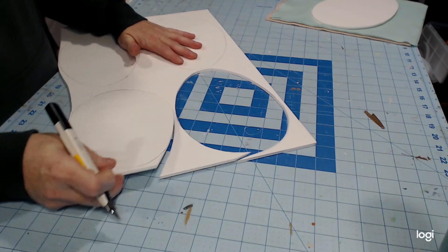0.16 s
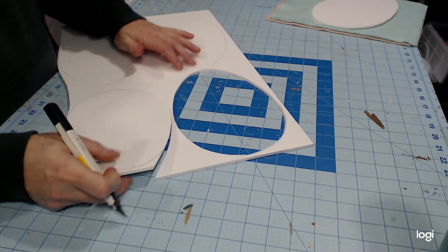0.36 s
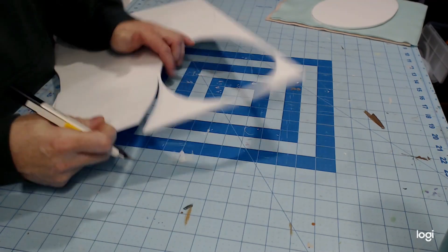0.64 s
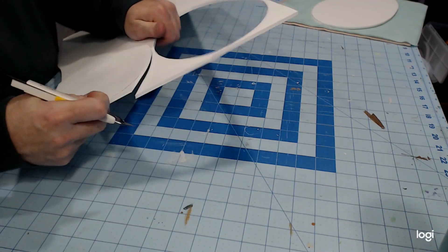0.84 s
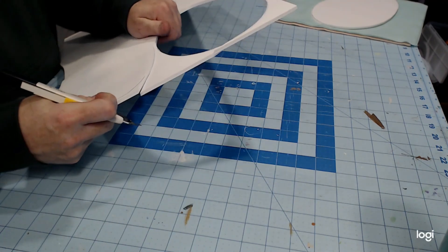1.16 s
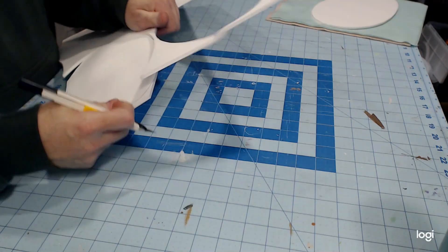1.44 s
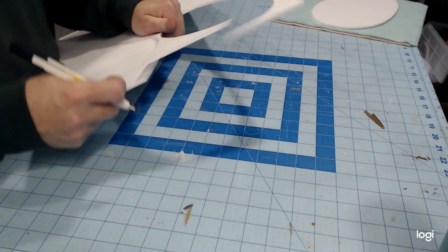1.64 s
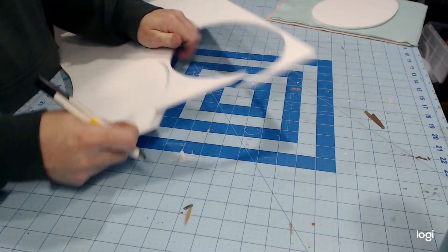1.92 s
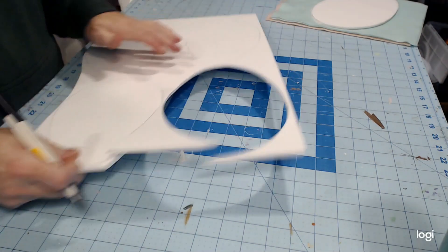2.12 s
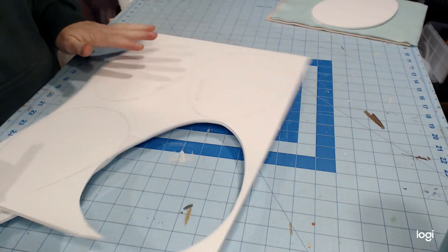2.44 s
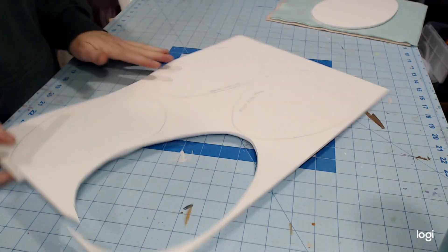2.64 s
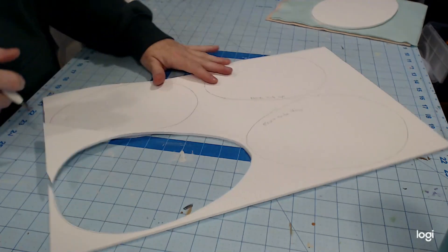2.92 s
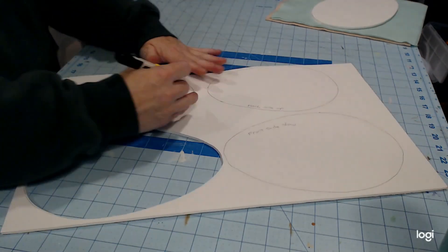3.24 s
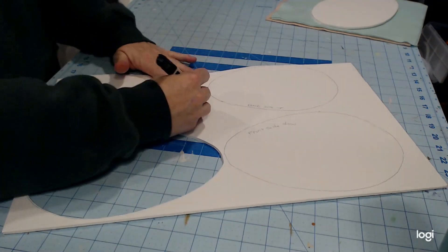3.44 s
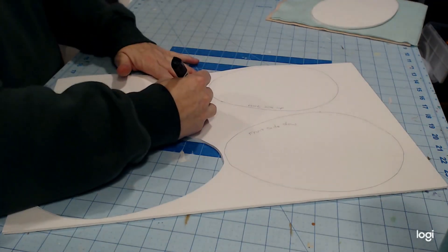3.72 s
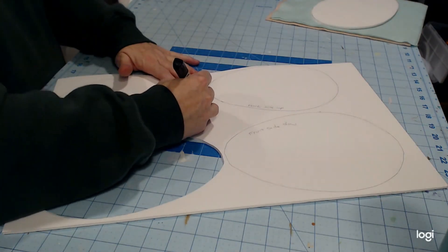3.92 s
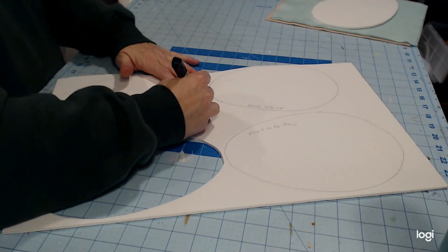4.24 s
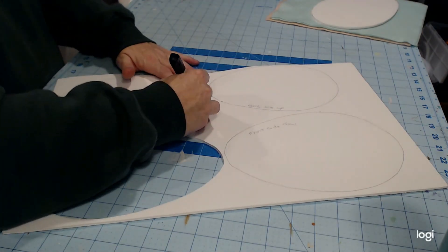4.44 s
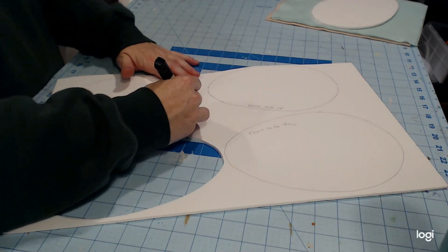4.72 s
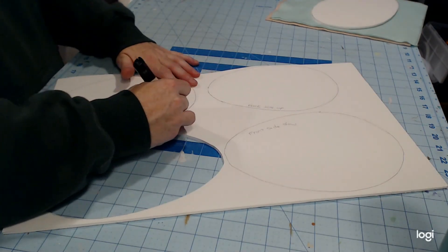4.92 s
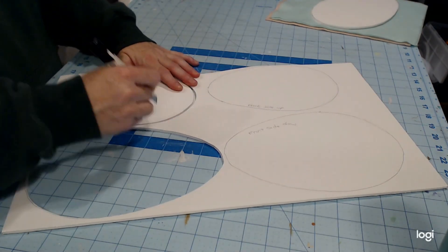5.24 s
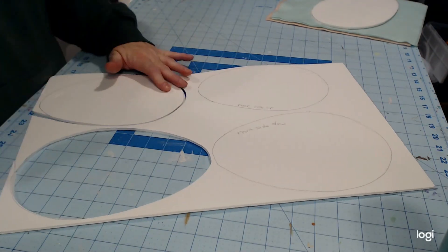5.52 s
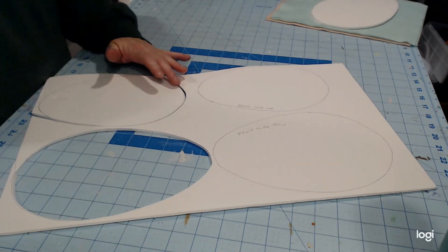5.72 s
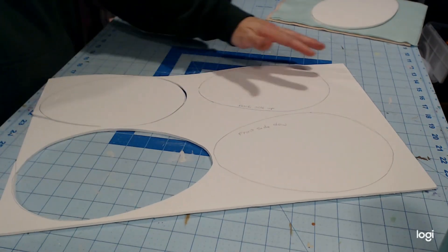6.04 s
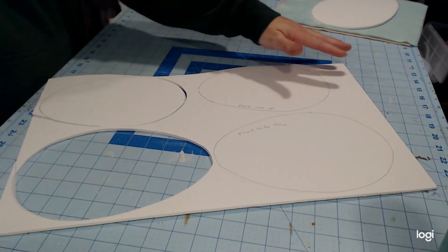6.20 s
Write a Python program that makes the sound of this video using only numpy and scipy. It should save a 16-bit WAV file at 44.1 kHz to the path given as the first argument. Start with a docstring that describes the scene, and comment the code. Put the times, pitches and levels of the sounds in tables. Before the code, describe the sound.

In a quiet room, close stereo microphones catch foam board scuffed and rattled on a table. Sharp hollow knocks peak just after one second, loud enough to distort, with more before two seconds. A long fizzy slide over the mat follows for about a second, with squeaks and ticks. Then a knife pushes through quietly with a low groan, ending in a crisp crackle, faint rubs and soft table bumps over light hiss.

```python
"""In a quiet room, at a table with a cutting mat, a sheet of foam board is lifted, knocked, turned and slid;
then a knife is pushed through it. Rubbing is noise of dense tiny slips that rings the sheet. Each knock is a
rattling contact that drives decaying modes, with a short noise crack; strong ones overload the input.
Filtered noise makes the ticks, the narrow squeals, the groan under the blade and the table's soft bumps.
Air noise, hum and a pulsing whine lie beneath, all heard by a close pair of microphones."""
import sys
import numpy as np
from scipy import signal
from scipy.fft import rfft, irfft, next_fast_len
from scipy.io import wavfile
from scipy.ndimage import uniform_filter1d

SR = 44100
rng = np.random.default_rng(int(sys.argv[2]) if len(sys.argv) > 2 else 0)


def waveform_to_disk(signal):
    """Save audio, clipped to [-1, 1], as 16-bit WAV at the path in sys.argv[1]."""
    frames = np.transpose(np.atleast_2d(signal))
    scaled = np.clip(frames, -1, 1) * 32767
    samples = np.round(scaled).astype(np.int16)
    wavfile.write(sys.argv[1], SR, samples)


N = 280917  # length in samples

# Room air spectrum. Each row: frequency in Hz, relative density in dB per Hz.
AIR_SPECTRUM = [(50, -13), (70, -7), (124, -6), (184, -8), (880, -24.5), (1190, -26.5), (2580, -32.5),
                (7400, -36), (8700, -41), (15900, -47.5)]
AIR_DB = -68.5
# Mains-like low hum. Each row: frequency in Hz, level in dB.
HUM_TONES = [(118.4, -69.5)]
# Faint tones of the electronics. Each row: frequency in Hz, level before pulsing in dB.
WHINE_TONES = [(8000, -85.5), (11900, -104)]
WHINE_PULSES_HZ = 27
# Coherence of the microphones. Each row: frequency in Hz, left-right likeness from 0 to 1.
LIKENESS = [(100, 0.13), (250, 0.93), (600, 0.9815), (1200, .85), (2500, 0.55), (5000, 0.68), (12000, .65)]
# Phase between the microphones. Each row: frequency in Hz, lead of the left in radians.
LEFT_LEAD = [(300, 0.3), (1000, .4), (2200, 1.3), (5000, 1.3), (8000, 1.8), (14000, 0.64)]

# Resonances of the rubbed sheet. Each row: mean frequency in Hz, width in Hz, relative level in dB.
RUB_RESONANCES = [(2004.4, 30, 0.5), (2956, 150, 4.5), (3890, 150, -4.5), (4945, 22, -8.5),
                  (5045, 12, -10.5), (7050, 150, -14.5), (7880, 43, -13)]
# Spectrum of the fine slips. Each row: frequency in Hz, relative density in dB per Hz.
GRIT_SPECTRUM = [(710, -39), (1200, -20.5), (1680, -17), (1910, -8), (2590, -7), (3210, -4), (4440, -6),
                 (5170, -5.5), (7070, -6), (8500, -19), (14800, -27), (15900, -31)]
# Spectrum of the rubbed sheet's low body. Each row: frequency in Hz, relative density in dB per Hz.
BODY_SPECTRUM = [(76, -38), (130, -9.5), (235, -5.5), (324, -8.5), (580, -4.5), (669, -7), (1800, -6.5),
                 (2340, -36.5), (3960, -120)]
BODY_PER_DB = -0.163  # lighter pressure leaves more body against the fizz
# Strokes of hand, sheet and blade. Each row: start, rise, hold and fall in seconds, pressure as the hold
# begins and as it ends in dB, body of the sheet at full pressure in dB, mean centre of the body in Hz.
STROKE_ROWS = [(0.0, .005, .055, 0.1217, -59, -55, -1, 786),
               (.195, .008, .19, 0.01093, -46, -53.5, -11, 932),
               (.39, .005, .076, 0.11, -45.5, -36.5, -4, 912), (.5, .03, .105, 0.008, -44, -51, -3, 863),
               (.635, .01, .036, 0.13037, -30, -46, 1.5, 877),
               (.78, .014, .052, 0.0847, -42.5, -42.5, -5.5, 976),
               (.952, .005, .01, 0.11, -61, -62, 2.5, 620), (1.1, .05, .004, 0.0044, -38, -22.5, -8, 1004),
               (1.22, .005, .195, 0.00527, -55.5, -54, 8, 1077),
               (1.45, .01, .005, 0.1456, -50, -44.5, -3.5, 607),
               (1.63, .01, 0.055, 0.023, -62.5, -65.5, 10, 780),
               (1.7, .045, .075, 0.0551, -41, -22.5, 1.5, 836),
               (1.85, .005, .195, .005, -35, -47, -5.5, 967),
               (3.1, .025, .155, 0.036, -51.5, -46.5, -20, 896.6),
               (3.3, .03, .012, .03, -55, -60, -11, 872.3), (3.354, .005, .005, 0.23, -64.5, -70, -1, 783),
               (4.05, .012, .03, .13, -73, -68.5, 5, 1037), (4.3, .034, .4, 0.0279, -60, -62, -6.5, 574.8),
               (4.74, .04, .188, 0.00885, -48, -44.5, -16, 1052),
               (5.02, .003, .005, 0.088, -66, -60.5, 8, 894),
               (5.24, .07, .075, 0.1118, -54, -50.5, -10, 883.6),
               (5.47, .02, .225, 0.0594, -73.5, -70.5, -4, 914),
               (6.18, .15, .037, 0.0032, -76, -70.5, 4.5, 696.4)]
RISE_DB, FALL_DB = 23.5, 25  # how far below its hold a stroke begins and ends
# The long slide of the sheet over the mat. Each row: time in seconds, pressure in dB.
SLIDE_PRESSURE = [(2.052, -35.5), (2.062, -23), (2.216, -27), (2.346, -25), (2.436, -25.5), (2.448, -34.5),
                  (2.472, -22), (2.55, -22.5), (2.576, -32), (2.598, -25), (2.62, -34.5), (2.65, -30.5),
                  (2.664, -30.5), (2.756, -38.5), (2.808, -33.5), (2.836, -38), (2.934, -32.5),
                  (2.978, -43), (3.022, -83), (3.04, -81)]
SLIDE_BODY_DB, SLIDE_BODY_HZ = -18, 922

# Lurches of the table. Each row: time in seconds, level in dB, time to sink by 20 dB in seconds
# (negative: that time is the slow build and the sinking is quicker; zero: the row adds nothing).
LURCHES = [(0.071, -34.5, 0.2538), (0.219, -41.5, 0), (.49, -36.5, 0.1256), (.69, -48.5, -0.04),
           (.9, -36.5, 0.21), (1.11, -36.5, 0.0565), (1.184, -24.5, 0.1687), (1.44, -34.5, 0.1049),
           (1.6, -51, 0.23), (1.95, -53, -0.02), (2.43, -37.5, 0.3332), (2.53, -51, 0.26),
           (2.74, -42, -0.04), (2.83, -55, -0.12), (3.1, -58.5, .12), (3.25, -56, 0.22),
           (3.48, -57.5, 0.16), (3.75, -65.5, 0.27), (4.0, -57.5, 0.01), (4.28, -47.5, 0.26),
           (4.7, -61, 0.49), (5.19, -43.5, .05), (5.3, -53.5, -0.45), (5.55, -44, 0.28), (5.62, -47, -0.19),
           (5.98, -52.5, 0.5), (6.34, -57.5, 0.04)]
# Spectrum of the lurches. Each row: frequency in Hz, relative density in dB per Hz.
LURCH_SPECTRUM = [(12, -12.5), (20, -2.5), (33, 1), (46, -4.5), (60, -17.5), (90, -23.5), (130, -39)]
LURCH_RISE, LURCH_REST_DB = 0.49, -73.5  # a lurch builds in this share of its sinking time

# Blows on the sheet. Each row: start in seconds, crack, blow and thump levels in dB, decay time of the
# contact in seconds, pitch that the spot favours in Hz, the same for the thump in Hz.
KNOCK_ROWS = [(0.1094, -66.5, -62.5, -39.5, 0.0069, 464.7, 400),
              (0.4148, -30, -51.5, -63.5, 0.0097, 918, 312), (0.4616, -23.5, -33, -57.5, 0.0062, 929, 263),
              (0.4743, -21.5, -29.5, -38.5, 0.0038, 1120, 150), (0.5666, -31, -29, -58, 0.0203, 930, 366),
              (0.597, -33.5, -26, -42.5, 0.0062, 562, 248), (0.638, -23.5, -51.5, -45.5, 0.0285, 925, 258),
              (0.6828, -27.5, -23.5, -23, 0.00388, 588, 280), (0.7094, -42, -25, -47, 0.0071, 613, 293),
              (0.7197, -23.5, -33, -38, 0.00345, 1120, 240), (0.789, -36, -35, -72.5, 0.0045, 564.6, 361),
              (0.9575, -51, -37.5, -39, .011, 617, 250), (1.1303, -25, -29.5, -49.5, 0.025, 940, 244),
              (1.1603, -1.5, 1.5, -7, 0.0038, 573, 333), (1.1666, -18.5, -4, -9.5, 0.0111, 568, 221),
              (1.1747, -7, -4.5, -9, 0.0077, 580, 220.6), (1.1835, -8.5, -9.5, -7.5, 0.00877, 576, 150.1),
              (1.1957, -16, -11.5, -12, 0.01147, 526, 144.4), (1.268, -29.5, -31, -49, 0.0069, 1170, 210),
              (1.4255, -18.5, -15, -7.5, 0.00995, 493, 241.8),
              (1.4512, -43, -32, -25.5, 0.0069, 474.8, 239.4), (1.5287, -62, -39.5, -68, 0.0088, 647, 264),
              (1.6009, -14.5, -7.5, -20, 0.006, 597.6, 274), (1.604, -25, -16, -28.5, 0.0112, 930, 263.3),
              (1.748, -26.5, -31.5, -55.5, 0.0285, 903, 392), (1.7846, -24, -34.5, -49, 0.016, 930, 398),
              (1.8148, -19, -13, -23, 0.0151, 575, 231), (1.8395, -32, -27, -27, 0.0198, 582.2, 149),
              (4.958, -40, -36, -51, 0.0107, 726, 230), (4.9682, -28, -30, -29.5, 0.0148, 660, 221.8),
              (4.9885, -29, -26, -30.5, 0.0126, 1155, 222)]
# Modes of the sheet. Each row: frequency before detuning in Hz, relative level in dB.
SHEET_MODES = [(150, -2), (190, -7), (235, 1.5), (280, 1), (332, -1.5), (400, -2.5), (484, -2), (565, 5),
               (652, 0), (780, -0.5), (930, 2), (1050, 0.5), (1165, -9), (1295, -5.5), (1410, -4),
               (1650, -12), (1940, -7), (2290, -12)]
# Spectrum of a crack of -20 dB. Each row: frequency in Hz, relative density in dB per Hz.
CRACK_SPECTRUM = [(710, -27), (1200, 2.5), (3210, -3), (4300, -8), (5460, -6.5), (10400, -23), (15100, -25),
                  (15900, -25)]
CYCLES = 19  # foam damps hard: swings until a mode is 60 dB down, counted at the lowest mode
LOWEST_HZ = 115  # a light sheet radiates little lower
SPREAD_DB = 1  # knocks and ticks land a little left or right

# Small dry ticks of blade and fingertips. Each row: start in seconds, level in dB, centre in Hz.
TICK_ROWS = [(0.202, -60.5, 2210), (0.2509, -38.5, 5990), (1.1485, -18, 2046), (1.406, -35.5, 3100),
             (2.6454, -19, 5700), (2.6828, -26, 5923), (3.0558, -66, 5810), (3.333, -50, 5099),
             (3.514, -71.5, 3113), (3.604, -59.5, 5714), (3.682, -45.5, 3368), (3.7376, -64.5, 3020),
             (3.9197, -62, 3991), (4.0615, -65, 5065), (4.1694, -66.5, 3030), (4.9685, -24.5, 3070),
             (5.062, -57, 3160), (5.1017, -57.5, 2423), (5.5995, -60.5, 4290)]
TICK_T60_S, TICK_RISE_S = 0.054, .0015
# Thin squeals. Each row: start and length in seconds, mean frequency in Hz, level at the middle in dB,
# swell from start to end in dB.
SQUEAL_ROWS = [(.313, 0.081, 2760, -52.5, 13), (.409, 0.038, 915.7, -39, -9.5),
               (.718, 0.0712, 1144, -39, -21), (.79, 0.093, 557, -48.5, -9), (.79, .09, 1143, -45.5, -0.5),
               (1.27, 0.079, 1149, -46.5, 3.5), (1.5, 0.1996, 2890, -61, -5.5),
               (1.767, 0.0672, 459.5, -29.5, 4), (2.058, 0.0686, 574.8, -42, -15),
               (2.296, 0.1337, 1927, -34, -13), (2.392, 0.046, 3160, -35.5, 23.5),
               (2.49, 0.0778, 1964, -34.5, 9.5), (2.5, 0.0762, 3145, -27, 5.5),
               (2.761, 0.08, 1075, -45, -3.5), (2.77, 0.0727, 1393, -44.5, -2.5),
               (2.9, 0.0925, 1282, -50.5, 1), (3.134, 0.212, 2977, -62.5, -11),
               (3.147, 0.178, 4958, -55.5, -13), (3.35, 0.117, 3087, -73, -5.5),
               (3.35, .13, 5064, -80, -6.5), (3.272, 0.09, 847, -64.5, -1.5),
               (4.784, 0.1767, 3040, -54.5, 6.5), (4.8, 0.1686, 4120, -60, 2),
               (5.29, 0.145, 934.3, -59.5, 6), (5.33, 0.0794, 556.4, -62, 1.5),
               (1.05, 0.052, 586, -63, 5.5), (1.9, 0.1645, 2020, -43, -5), (1.92, 0.15, 899.4, -48, 4),
               (3.2, 0.062, 342, -61, 0.5), (4.46, 0.0623, 957, -67, -0.5)]
GLIDE = 0.024  # a squeal drifts up by this share
# The table groans under the blade in two pushes. Each row of a push: time in seconds, level in dB.
GROAN_PUSHES = [
    [(4.03, -91), (4.068, -57), (4.17, -57.5), (4.21, -70.5)],
    [(4.3, -60.5), (4.338, -48), (4.596, -50), (4.66, -51), (4.675, -33.5), (4.768, -43), (4.852, -69.5),
     (4.95, -52.5)],
]
GROAN_HZ = 248.06  # mean frequency of the narrow mode

EDGE_HZ = 16075  # upper band limit of the input


def gain_of(db):
    """An amplitude ratio is ten to the power of decibels over twenty."""
    return 10 ** (np.asarray(db) / 20)


def evened(x):
    """Dividing by the root mean square gives unit power."""
    return x / np.sqrt(np.mean(x ** 2) + 1e-20)


def read(points, hz):
    """Interpolates linearly on a logarithmic frequency axis."""
    f, value = np.transpose(points)
    return np.interp(np.log(hz + 1), np.log(f + 1), value)


def add(mix, s, sound):
    """Superposition: a two-channel sound adds to the mix from a given time."""
    part = mix[:, round(s * SR):][:, :sound.shape[1]]
    part += sound[:, :part.shape[1]]


def coloured(x, points):
    """Spectral shaping by multiplication in frequency, silent outside the table, at rms 1."""
    size = next_fast_len(x.shape[-1])
    hz = np.fft.rfftfreq(size, 1 / SR)
    inside = (hz > points[0][0]) * (hz < points[-1][0])
    gain = gain_of(read(points, hz)) * inside
    return evened(irfft(rfft(x, size) * gain, size)[..., :x.shape[-1]])


def resonate(x, hz, width):
    """Heterodyne resonance of gain 1: shifts the curve hz down to zero, smooths, and shifts back."""
    turn = np.exp(2j * np.pi * np.cumsum(hz * np.ones(x.shape[-1])) / SR)
    r = np.exp(-np.pi * width / SR)
    return 2 * (turn * signal.lfilter([1 - r], [1, -r], x / turn + 1e-18)).real


def above(x, hz):
    """High-pass filtering, run both ways so that phase is kept."""
    return signal.sosfiltfilt(signal.butter(4, hz, "high", fs=SR, output="sos"), x)


def pair(x):
    """Partial coherence: two unrelated sounds become two microphones that share a part of one."""
    size = next_fast_len(x.shape[1])
    hz = np.fft.rfftfreq(size, 1 / SR)
    left, other = rfft(x, size)
    same = np.clip(read(LIKENESS, hz), 0, 1)
    right = same * left * np.exp(-1j * read(LEFT_LEAD, hz)) + np.sqrt(1 - same ** 2) * other
    return irfft(np.array([left, right]), size)[:, :x.shape[1]]


def noise_pair(count):
    """White noise with the partial coherence of the two microphones."""
    return pair(rng.standard_normal((2, count)))


def sides(db):
    """Interaural-style level difference, split evenly between left and right gains."""
    return gain_of(np.array([db / 2, -db / 2])).reshape(2, -1)


def wander(count, width):
    """Random modulation: noise smoothed twice over width samples, at rms 1."""
    return evened(uniform_filter1d(uniform_filter1d(rng.standard_normal(count), width), width))


def streaked(x, depth_db):
    """Dense upper modes of the sheet: narrow bands that come and go as the contact moves."""
    z = signal.stft(x, nperseg=1024, noverlap=768)[2]
    field = rng.standard_normal(z.shape[1:])
    narrow = evened(uniform_filter1d(uniform_filter1d(field, size=3, axis=0), size=16, axis=1))
    broad = evened(uniform_filter1d(uniform_filter1d(field, size=30, axis=0), size=6, axis=1))
    z = z * gain_of(depth_db * (narrow + 0.47 * broad))
    return evened(signal.istft(z, nperseg=1024, noverlap=768)[1][:, :x.shape[1]])


def room():
    """Steady background: air noise that swells a little, a wavering narrow-band hum and a pulsing whine."""
    air_level = gain_of(AIR_DB + 1.3 * wander(N, width=3000))
    air = air_level * coloured(noise_pair(N), AIR_SPECTRUM)
    hum = sum(gain_of(db) * evened(resonate(rng.standard_normal(N), f, 3.7)) for f, db in HUM_TONES)
    t = np.arange(N) / SR
    pulses = np.maximum(.3 + np.sin(2 * np.pi * WHINE_PULSES_HZ * t), 0)
    whine = sum(gain_of(db) * np.sin(2 * np.pi * f * t) for f, db in WHINE_TONES)
    return air + hum + pulses * whine


def rub(s, press_db, body_db, body_hz):
    """Friction: uneven, clumped slips ring the sheet; its loudest low band moves with the contact."""
    t = np.arange(s[0], s[-1] + .003, 1 / SR)
    count = len(t)
    press_db = np.interp(t, s, press_db)
    body_db = body_db + BODY_PER_DB * (press_db - press_db.max())
    body_hz = body_hz * np.exp(0.037 * wander(count, width=2500))
    clumps = gain_of(0.86 * wander(count, width=90) + 1.4 * wander(count, width=400))
    slip_size = gain_of(2.2 * np.minimum(rng.exponential(1, (2, count)), 4))
    slips = pair(rng.standard_normal((2, count)) * slip_size)
    rings = 0
    for f, width, db in RUB_RESONANCES:
        ring_hz = f * (1 + 0.006 * wander(count, width=1500))
        rings = rings + gain_of(db) * evened(resonate(slips, ring_hz, width))
    face = streaked(coloured(slips, GRIT_SPECTRUM) + 0.2 * evened(rings), 3.3)
    body = coloured(slips, BODY_SPECTRUM)
    body = evened(body + 1.2 * evened(resonate(body, body_hz, 240)))
    # broad soft contact has more body and less fizz
    dull = 1 - gain_of(-.3 * np.maximum(body_db + 12.5, 0))
    sound = face - dull * above(face, 7600) + gain_of(body_db) * streaked(body, 3.2)
    fade = np.minimum(1, np.minimum(t - t[0], t[-1] - t) / .003)
    return s[0], sound * gain_of(press_db) * clumps * fade


def stroke(s, rise, hold, fall, from_db, to_db, body_db, body_hz):
    """Friction follows normal force: pressure rises, drifts through the hold and falls away."""
    times = s + np.cumsum(np.abs([0, rise, hold, fall]))
    return rub(times, [from_db - RISE_DB, from_db, to_db, to_db - FALL_DB], body_db, body_hz)


def bumps():
    """Structure-borne low noise: the table lurches as arms and sheet press on it."""
    s, db, sink = np.transpose(LURCHES)[:, :, None]
    since = (np.arange(N) / SR - s) / sink  # in sinking times
    drop_db = 20 * np.maximum(since, -since / LURCH_RISE)
    level = gain_of(LURCH_REST_DB) + gain_of(db - drop_db).max(0)
    a, b = coloured(rng.standard_normal((2, N)), LURCH_SPECTRUM)
    lurch = np.array([0.79 * a + .5 * b, a - .5 * b])
    steady = lurch / np.sqrt(uniform_filter1d((lurch ** 2).mean(0), size=4000) + 0.08)
    return steady * level


def knock(s, crack_db, blow_db, thump_db, contact, spot_hz, thump_hz):
    """Impact excitation: a rattling contact drives the sheet's modes and throws off a short crack."""
    t = np.arange(9000) / SR
    force = np.exp(-t / max(contact, 1e-3)) * np.minimum(t / (.0006 + .15 * contact), 1)
    chatter = noise_pair(len(t)) * force

    hz, db = np.transpose(SHEET_MODES)[:, :, None]
    t60 = CYCLES / hz[0] * np.sqrt(hz[0] / hz)
    bend = 1 + 0.018 * rng.standard_normal(hz.shape)  # the grip detunes the modes from blow to blow
    low = hz[:, 0] < 440  # these make the thump, the others the blow
    octaves_off = abs(np.log2(hz / np.where(low, thump_hz, spot_hz)[:, None]))
    mode_db = db - np.minimum(35 * octaves_off, 10) - 60 * t / t60
    modes = gain_of(mode_db) * np.sin(2 * np.pi * hz * bend * t)
    radiate = signal.butter(3, LOWEST_HZ, "high", fs=SR, output="sos")
    parts = []
    for group in (modes[~low], modes[low]):
        driven = signal.fftconvolve(chatter, group.sum(0)[None])[:, :len(t)]
        parts.append(signal.sosfilt(radiate, driven))

    tail = force + 0.36 * gain_of(-60 * t / 0.11)  # nearby surfaces throw the crack back
    tilt = 0.3016 * (crack_db + 20.0)  # harder blows crack brighter, in dB per octave
    brighter = [(f, db + tilt * np.log2(f / 3000)) for f, db in CRACK_SPECTRUM]
    parts.append(streaked(coloured(noise_pair(len(t)), brighter), 4.5) * tail)

    sound = 0
    for db, part in zip((blow_db, thump_db, crack_db), parts):
        peak = np.sqrt(2 * uniform_filter1d((part ** 2).mean(0), size=120).max())
        sound = sound + gain_of(db) * part / peak
    return s, sides(SPREAD_DB * rng.standard_normal()) * sound


def tick(s, db, hz):
    """A brief contact: a decaying puff of grit noise with a broad resonance."""
    t = np.arange(5000) / SR
    grit = coloured(noise_pair(len(t)), GRIT_SPECTRUM)
    puff = evened(grit + 0.47 * evened(resonate(grit, hz, 480)))
    envelope = gain_of(db - 60 * t / TICK_T60_S) * np.minimum(t / TICK_RISE_S, 1)
    return s, envelope * puff * sides(SPREAD_DB * rng.standard_normal())


def squeal(s, length, hz, db, swell_db):
    """Rubbing that holds on to one mode: narrow-band noise heard as a fuzzy, fluttering whistle."""
    count = round(length * SR)
    along = np.linspace(-.5, .5, count)
    hz = hz * (1 + GLIDE * along)
    narrow = resonate(noise_pair(count), hz, 15 + 0.026 * hz.mean())
    tone = resonate(narrow, hz, 80 + 0.0396 * hz.mean())
    return s, gain_of(db + swell_db * along) * evened(tone) * signal.windows.tukey(count, .3)


def slide():
    """Sustained friction: the sheet rubs along the mat under varying pressure."""
    return rub(*np.transpose(SLIDE_PRESSURE), SLIDE_BODY_DB, SLIDE_BODY_HZ)


def groan(rows):
    """Forced resonance: uneven slips of the blade shake a narrow low table mode and a wider one above."""
    s, db = np.transpose(rows)
    t = np.arange(s[0], s[-1], 1 / SR)
    slips = noise_pair(len(t))
    hz = GROAN_HZ * (1 + 0.076 * wander(len(t), width=1200))
    narrow = evened(resonate(resonate(slips, hz, 48.8), hz, 71.6))
    wide = evened(resonate(resonate(slips, 1.247 * hz, 120.26), 1.228 * hz, 100))
    sound = narrow + 0.103 * wide
    sound = sound / np.sqrt(uniform_filter1d((sound ** 2).mean(0), size=1500) + 0.24)  # evens the level
    return s[0], gain_of(np.interp(t, s, db)) * evened(sound) * signal.windows.tukey(len(t), .06)


def scene():
    """Linear superposition of all sources at the two microphones."""
    mix = room() + bumps()
    for table, source in ((STROKE_ROWS, stroke), (KNOCK_ROWS, knock), (TICK_ROWS, tick), (SQUEAL_ROWS, squeal)):
        for row in table:
            add(mix, *source(*row))
    add(mix, *slide())
    for rows in GROAN_PUSHES:
        add(mix, *groan(rows))
    return mix


def record(dry):
    """Overload flattens peaks at the input; a linear-phase low-pass then limits the band."""
    clipped = np.clip(dry, -.95, .95)
    low_pass = signal.firwin(511, EDGE_HZ, window=("kaiser", 9), fs=SR)
    return signal.oaconvolve(clipped, low_pass[None], "same")


dry = scene()
out = record(dry)
waveform_to_disk(out)
```